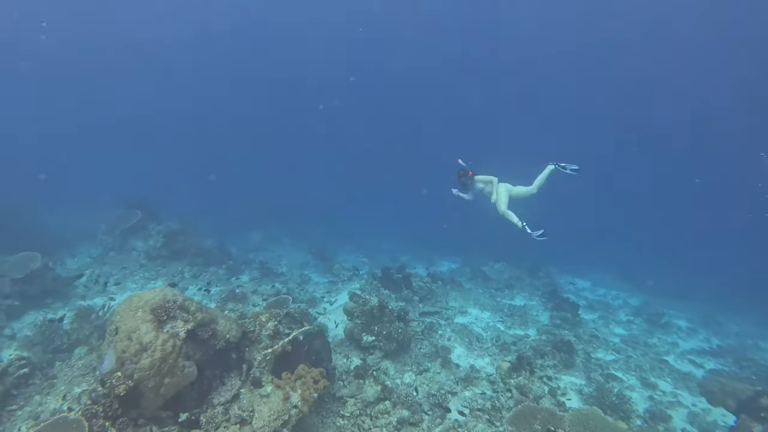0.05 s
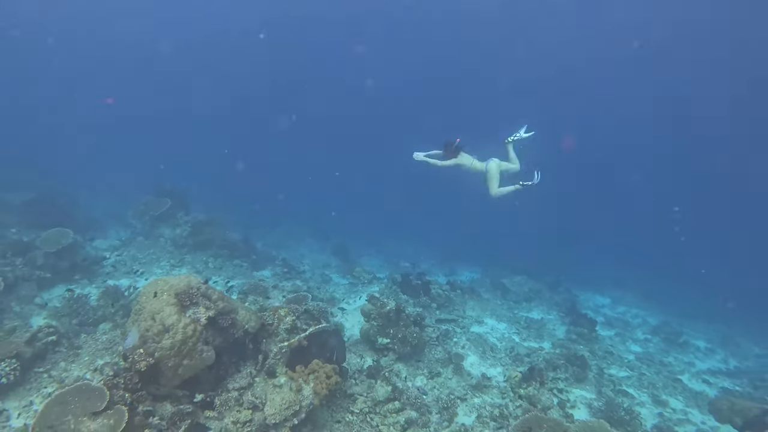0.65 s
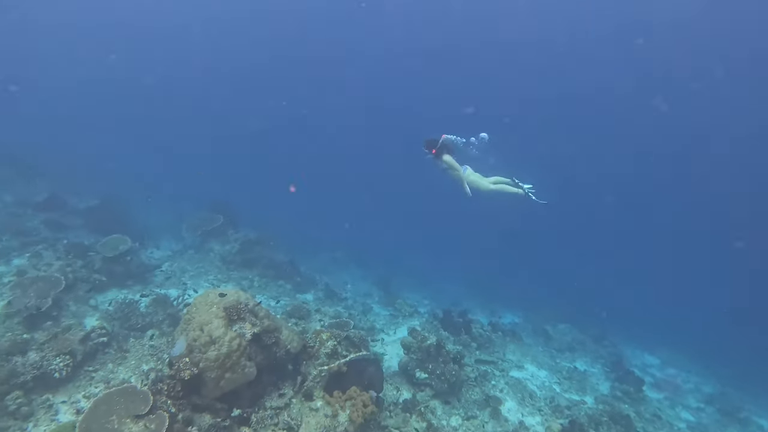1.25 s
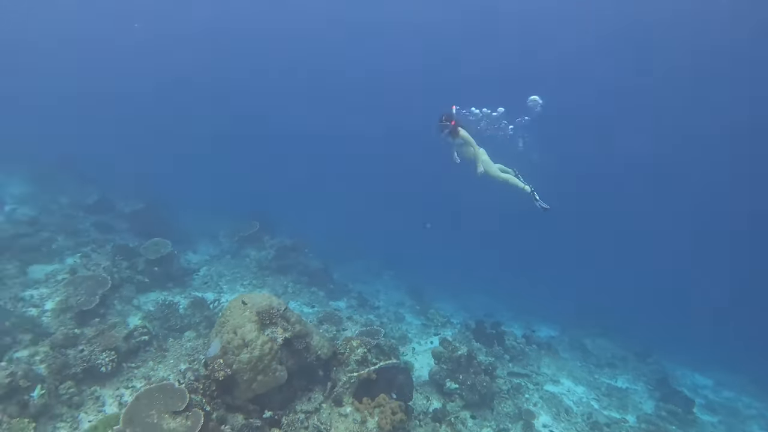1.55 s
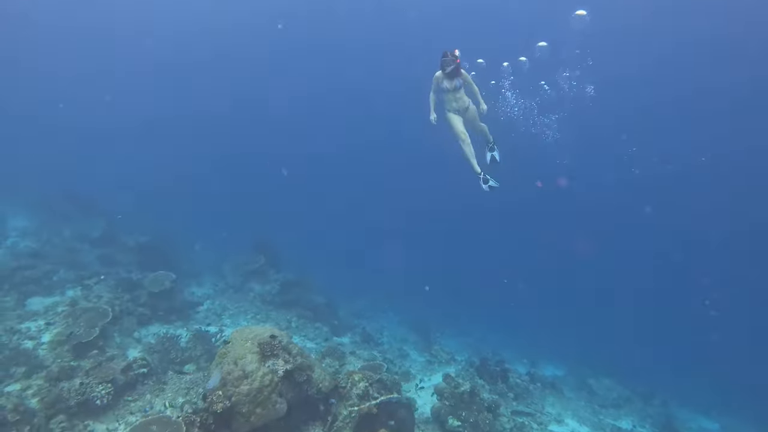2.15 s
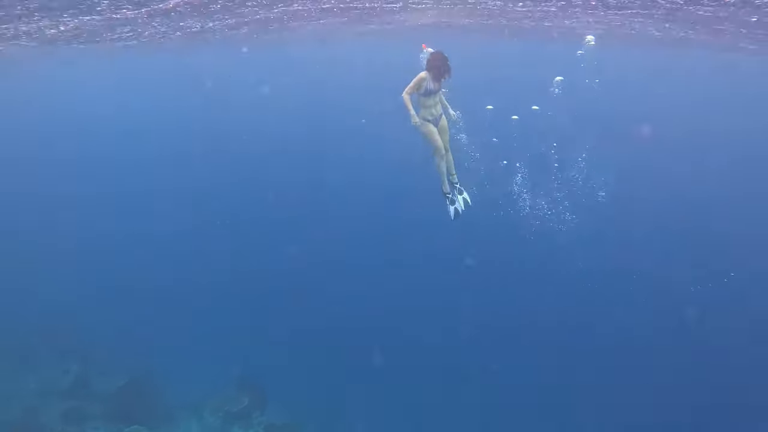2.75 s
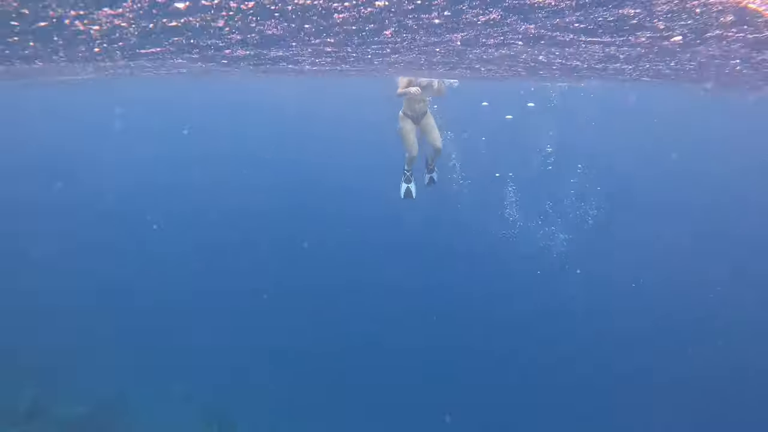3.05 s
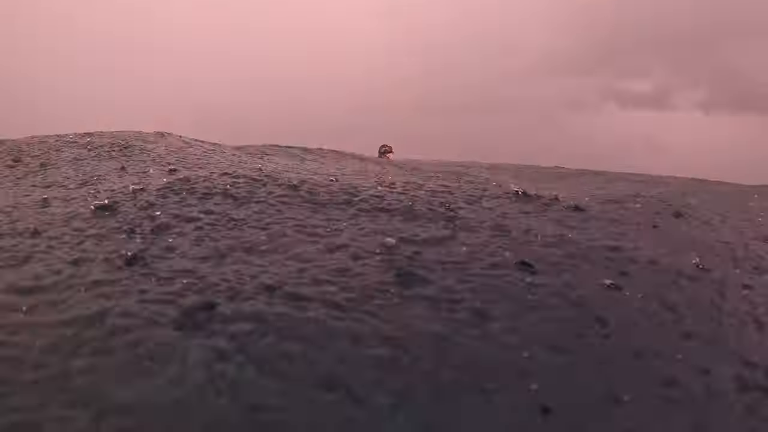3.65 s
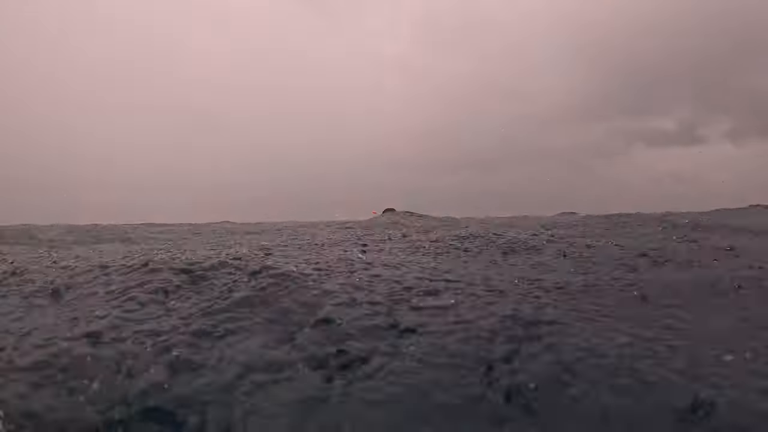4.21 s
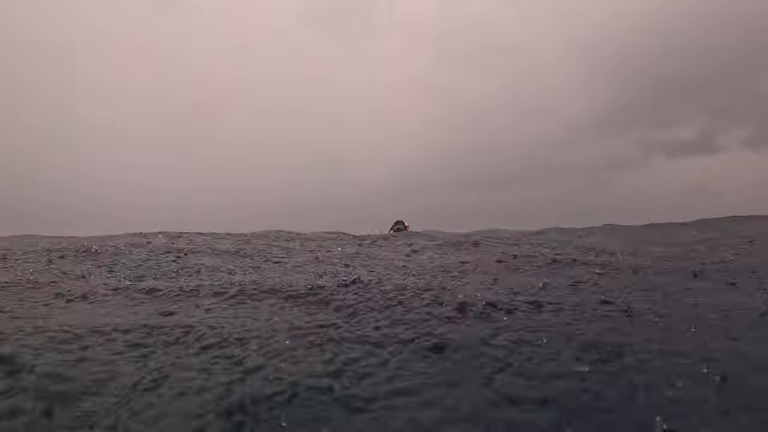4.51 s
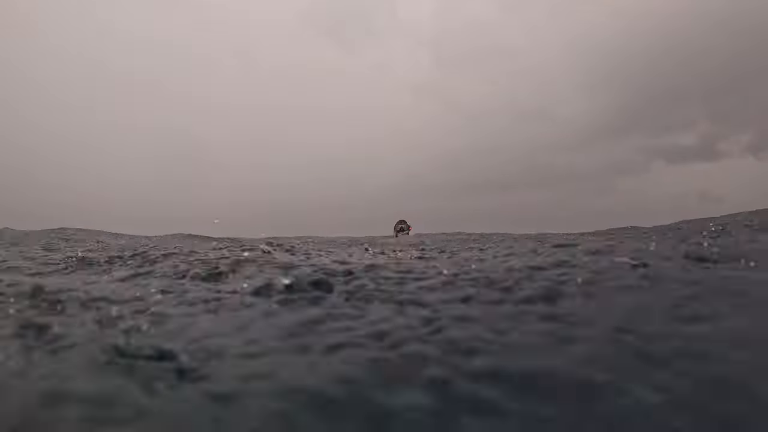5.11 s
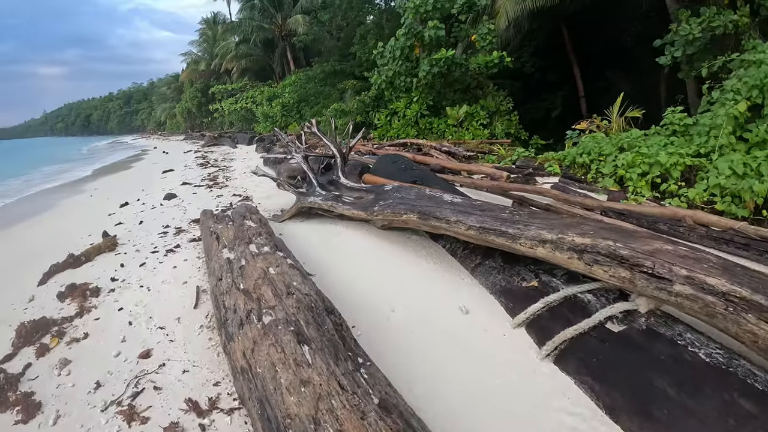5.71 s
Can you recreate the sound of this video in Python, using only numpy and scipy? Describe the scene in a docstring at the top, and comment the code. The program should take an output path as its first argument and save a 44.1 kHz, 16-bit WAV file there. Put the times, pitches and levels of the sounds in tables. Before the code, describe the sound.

A camera housing clacks and glugs underwater amid snapping shrimp, water slaps and bubbles around it, then faint wind and distant surf follow.

```python
"""Hollow knocks under water: a waterproof camera housing bumps in the hand as it rises from a coral reef.
Its shell clacks, trapped air glugs, runs of ticks purr like a small motor, and shrimp snap all around.
At the surface, water slaps, splats, fizzes and gulps round the microphone, and the spray grows duller.
The water stops dead; a breezy beach fades in, with wind buffeting the microphone over far surf."""
import sys
import numpy as np
from scipy import signal
from scipy.fft import rfft, irfft
from scipy.io import wavfile
from scipy.ndimage import uniform_filter1d

SR = 44100
rng = np.random.default_rng(int(sys.argv[2]) if len(sys.argv) > 2 else 0)


def dump(signal):
    """Clip the signal to [-1, 1] and save it as 16-bit WAV at the path in sys.argv[1]."""
    limited = np.clip(np.atleast_2d(signal).T, -1, 1)
    pcm = np.round(limited * 32767).astype(np.int16)
    wavfile.write(sys.argv[1], SR, pcm)


N = 263277
T = np.arange(N) / SR
SURFACE_S, CUT_S, BEACH_S = 3.17, 5.136, 5.3
BAND_LIMIT_HZ, OPEN_TREBLE_HZ = 16100, 16960
KNOCK_SCATTER = 0.1154  # relative spread of pitch and timing from blow to blow

# far surf and leaves: (frequency [Hz], level [dB])
SHORE_EQ = [(150, -13), (600, -19.5), (1090, -1.5), (1350, -18), (4100, -25), (8000, -52.5)]
# wind on the microphone: (frequency [Hz], level [dB])
WIND_EQ = [(21, 2.5), (30, -19), (115, -41.5), (165, -53.5)]
# gusts of that wind: (time [s], level [dB])
WIND_LEVEL = [(5.33, -18), (5.46, -27), (5.62, -25), (5.75, -33.5), (5.821, -19.5)]
# water pushing on the housing: (frequency [Hz], level [dB])
SLOSH_EQ = [(20, 5.5), (50, -4), (105, -5), (170, -20)]
# water gurgling along it: (frequency [Hz], level [dB])
GURGLE_EQ = [(170, -4), (280, 3), (700, -16)]
# slow contour of push and gurgle: (time [s], level [dB])
SLOSH_LEVEL = [(1.3, -31), (2.8, -32), (3.6, -31), (4.2, -27.5), (4.599, -37.5), (5.102, -28)]
# hollow sizzle of the reef, before its resonances climb: (frequency [Hz], level [dB])
REEF_EQ = [(2650, -17), (3080, -22), (3300, -13.5), (3600, -25.5), (3870, -13), (4150, -31), (4580, -17),
           (5700, -14), (7300, -23.5), (15000, -26)]
# swell of that sizzle: (time [s], level [dB])
REEF_LEVEL = [(.3, -53), (1.4, -49.5), (3.1, -57)]
# near shrimp snaps: (time [s], peak level [dB])
NEAR_SNAPS = [(.158, -25), (.387, -15.5), (0.4276, -17.5), (.54, -19), (0.5553, -11.5), (0.689, -18.5),
              (1.651, -15.5), (1.808, -19.5)]
# crack of one snap: (frequency [Hz], level [dB])
SNAP_EQ = [(4000, 5), (5400, 12.2), (16000, 1.3)]
# wavelets washing over the housing: (crest time [s], relative level [dB])
WAVELET_CRESTS = [(3.274, -28), (3.421, -34.5), (3.727, -33.5), (4.023, -28), (4.218, -31), (4.818, -40.5),
                  (5.11, -32)]
# fine hiss of the water film: (frequency [Hz], level [dB])
HISS_EQ = [(450, 10), (5200, 5.5), (16000, -0.5)]
# small free bubbles: (time [s], starting pitch [Hz], peak level [dB])
BUBBLE_PLINKS = [(.455, 1640, -16), (.481, 1976, -25), (3.157, 1760, -11.5), (3.318, 2730, -9.5),
                 (3.441, 1106, -22.5), (3.5118, 2800, -7.5), (3.767, 2830, -7), (3.914, 2430, -10),
                 (4.045, 2100, -8.5), (4.067, 4330, -8.5), (4.232, 3510, -8)]
# large air pockets against the housing: (time [s], starting pitch [Hz], peak level [dB])
AIR_GULPS = [(2.97, 113, -13), (3.914, 215, -17), (4.204, 146.7, -8.5), (4.212, 400, -16.5),
             (4.226, 100.5, -11), (4.405, 139.6, -9), (5.109, 324.5, -11), (5.12, 76.4, -8.5)]
# soft glugs of air between the knocks: (time [s], level [dB])
AIR_GLUGS = [(0.429, -22), (1.072, -35.5), (1.783, -18.5), (2.025, -21.5), (2.94, -18.5)]
# low ring of a tick: (base frequency [Hz], level [dB], t60 [s])
TICK_LOW_MODES = [(984, -6, 0.062), (710, -9.5, 0.0096), (1170, -10, 0.02)]
# high ring of a tick, retuned for each run: (base frequency [Hz], level [dB], t60 [s])
TICK_HIGH_MODES = [(1770, -2.5, 0.022), (2114, -1, 0.0027)]
# faint bed of ticking under water: (time [s], level [dB])
TICKING_LEVEL = [(.35, -37.5), (.8, -30.5), (.92, -33.5), (3.15, -36.5)]
# runs of quick ticks: (start [s], end [s], level [dB], high ring balance [dB], high ring pitch [Hz])
TICK_RUNS = [(0.194, 0.196, -10, 2.5, 1750), (0.2237, .29, -15.5, 2.5, 1647), (0.628, 0.723, -17, -5, 1680),
             (1.034, 1.069, -16.5, 5, 1770), (1.126, 1.171, -15.5, 2, 1720), (1.229, 1.266, -10, 7, 1750),
             (1.735, 1.809, -16, 2.5, 1880), (2.135, 2.192, -13.5, 7, 1930)]
# loudest splats at the surface: (time [s], level [dB], centre frequency [Hz])
SURFACE_SPLATS = [(3.12, -24.5, 1110), (3.136, -23, 1170), (3.156, -20.5, 4130), (3.209, -19, 5700),
                  (3.244, -26, 4230), (3.266, -20.5, 4760), (3.375, -27.5, 6600), (3.409, -23, 6160),
                  (3.599, -24.5, 10500), (3.712, -23.5, 7400), (3.895, -22.5, 4650), (3.913, -20.5, 1500),
                  (3.955, -19.5, 4500), (3.973, -22, 5000), (4.012, -26.5, 2430), (4.028, -17.5, 9900),
                  (4.151, -19.5, 1310), (4.172, -23.5, 3570), (4.387, -26, 3650), (4.547, -34.5, 4560),
                  (4.578, -26, 6030), (4.654, -28, 3490), (4.676, -30.5, 2600), (4.741, -27, 1910),
                  (4.813, -25, 2070), (4.841, -25, 1800), (4.977, -33, 2204), (5.119, -21.5, 693)]
# flat slaps of water: (time [s], peak level [dB])
WATER_SLAPS = [(3.157, -9), (4.058, -13), (4.082, -7.5), (4.0915, -11), (4.128, -6)]
# body of one slap: (frequency [Hz], level [dB])
SLAP_EQ = [(150, 5), (550, -0.5), (1320, -1.5), (2200, -12)]
# modes of the housing's shell: (frequency [Hz], level [dB], t60 [s])
SHELL_MODES = [(730, 5, 0.026), (1000, 6, 0.024), (1373, 10.5, 0.013), (1800, 15.5, 0.0073)]
# knocks on the housing: (time [s], clack level [dB], favoured pitch [Hz], thud level [dB])
HOUSING_KNOCKS = [(.001, -17, 953, -15.5), (0.12, -8.5, 724, -14), (.395, -13, 662, -27),
                  (.843, -11.5, 980, -27), (0.8509, -2, 1120, -11), (0.862, -5.5, 990, -26.5),
                  (0.9423, -5.5, 1160, -12.5), (1.381, -3, 1448, -12), (1.478, -23, 770, -21),
                  (1.805, -11, 1040, -13), (1.904, -4, 1510, -10), (2.298, 0, 1420, -10),
                  (2.394, -17.5, 740, -26), (2.427, -13.5, 750, -13.5), (2.504, -14.5, 1100, -18.5),
                  (2.579, -6.5, 1000, -14.5), (2.606, -13.5, 850, -26), (2.802, -6.5, 1170, -13.5),
                  (2.955, -9.5, 730, -12)]


def amp(db):
    """Turns decibels into gain."""
    return 10 ** (np.asarray(db) / 20)


def unit(x):
    """Scales to rms 1."""
    return x / np.sqrt(np.mean(x ** 2) + 1e-20)


def unit_peak(x):
    """Scales to an envelope peak of 1."""
    return x / abs(signal.hilbert(x)).max()


def fader(rows):
    """Gain that rides through (time, level) rows."""
    return amp(np.interp(T, *np.transpose(rows)))


def eq_gain(points, hz):
    """Gain of an EQ curve, falling 23 dB an octave beyond its ends."""
    point_hz, db = np.transpose(points)
    octave, knots = np.log2(hz + 1), np.log2(point_hz)
    outside = np.maximum(knots[0] - octave, 0) + np.maximum(octave - knots[-1], 0)
    return amp(np.interp(octave, knots, db) - 23 * outside)


def filtered(x, order, hz, kind):
    """Butterworth filter."""
    return signal.sosfilt(signal.butter(order, hz, kind, fs=SR, output="sos"), x)


def eq_noise(points):
    """Noise coloured by an EQ curve; rms 1."""
    return unit(irfft(rfft(rng.standard_normal(N)) * eq_gain(points, np.fft.rfftfreq(N, 1 / SR)), N))


def band_noise(low_hz, high_hz, size):
    """Noise in one band; rms 1."""
    return unit(filtered(rng.standard_normal(size), 2, [low_hz, high_hz], "band"))


def sharpest_click(gain):
    """The minimum-phase click with this gain spectrum."""
    log_gain = np.log(np.maximum(np.r_[gain, gain[-2:0:-1]], 1e-5))
    return np.fft.ifft(np.exp(np.conj(signal.hilbert(log_gain)))).real


def wander(depth_db, size):
    """A random factor around 1 that drifts over about size samples."""
    drift = uniform_filter1d(uniform_filter1d(rng.standard_normal(N), size), size)
    return amp(depth_db * np.clip(unit(drift), -2, 1))


def add(mix, s, sound):
    """Mixes a sound in at time s."""
    part = mix[..., max(round(s * SR), 0):][..., :sound.shape[-1]]
    part += sound[..., :part.shape[-1]]


def ring(modes, t, detune):
    """Dying modes of alternating sign, tuned a little differently at each blow."""
    out = np.zeros(len(t))
    for k, (hz, db, t60) in enumerate(modes):
        pitch = hz * (1 + detune * rng.standard_normal())
        out += (-1) ** k * amp(db - 60 * t / t60) * np.sin(2 * np.pi * pitch * t)
    return out


def muffled(x, edge_hz, leak_db):
    """The housing passes little above its own modes."""
    return filtered(x, 8, edge_hz, "low") + amp(leak_db) * x


def rumble(eq, level):
    """Low turbulence, evened out so that it follows a level curve."""
    noise = eq_noise(eq)
    return noise / np.sqrt(uniform_filter1d(noise ** 2, size=6000)) * fader(level)


def beach(shore_db=-52, fade_s=0.1):
    """Wind buffets the microphone over a far wash of surf and leaves."""
    fade_in = np.clip((T - BEACH_S) / fade_s, 0, 1) ** 2
    return fade_in * (amp(shore_db) * eq_noise(SHORE_EQ) + rumble(WIND_EQ, WIND_LEVEL))


def slosh(gurgle_db=-15):
    """Water pushes on the housing and gurgles softly along it."""
    push = rumble(SLOSH_EQ, SLOSH_LEVEL) * wander(depth_db=4.2, size=900)
    gurgle = amp(gurgle_db) * rumble(GURGLE_EQ, SLOSH_LEVEL) * wander(depth_db=3, size=500)
    return push + gurgle


def patter(per_s, spread_db):
    """Random impulses, a few much larger than the rest."""
    size = amp(spread_db * np.minimum(rng.exponential(1, N), 4.5))
    return size * rng.choice([-1, 1], N) * (rng.random(N) < per_s / SR)


def reef_sizzle(width_db=-3, climb_per_s=0.049):
    """Far shrimp blur into a hollow sizzle whose resonances climb as the camera rises."""
    centre, left, right = [patter(per_s=1000, spread_db=5) for _ in range(3)]
    crackle = centre + amp(width_db) * np.array([left, right]) + 0.4 * rng.standard_normal((2, N))
    hz, t, spectrum = signal.stft(crackle, SR, nperseg=512)
    resonances = eq_gain(REEF_EQ, hz[:, None] / (1 + climb_per_s * t))
    sizzle = signal.istft(spectrum * resonances, SR, nperseg=512)[1][:, :N]
    return fader(REEF_LEVEL) * unit(sizzle) * (T < SURFACE_S)


def shrimp_snaps(lesser_db=-39, tail_db=-19.5, tail_t60=0.015):
    """Near shrimp crack among many lesser ones; each snap has its own low cut and a short stereo tail."""
    out, t, hz = np.zeros((2, N)), T[:512], np.fft.rfftfreq(512, 1 / SR)
    lesser = [(s, lesser_db + 4.3 * min(rng.exponential(), 3)) for s in rng.uniform(0, SURFACE_S, 110)]
    for s, db in NEAR_SNAPS + lesser:
        low_cut_hz = rng.uniform(3600, 5000)
        click = sharpest_click(eq_gain(SNAP_EQ, hz) / (1 + (low_cut_hz / (hz + 1)) ** 4))
        scatter = rng.standard_normal(len(t)) + .5 * rng.standard_normal((2, len(t)))
        tail = scatter * amp(tail_db - 60 * t / tail_t60)
        crack = signal.fftconvolve((t == 0) + tail, click[None])
        add(out, s, amp(db) * crack / abs(crack).max())
    return out


def wetness(s, wash_db_per_s=131, drain_db_per_s=114, floor_db=-44):
    """Gain of fizz and froth: each wavelet washes up, then drains to the level of the wet housing."""
    washes = [amp(db - np.maximum(wash_db_per_s * (crest_s - s), drain_db_per_s * (s - crest_s)))
              for crest_s, db in WAVELET_CRESTS]
    return np.sqrt(amp(floor_db) ** 2 + np.sum(np.square(washes), axis=0))


def treble_edge(s, from_s=3.373, octaves_per_s=1.194, lowest_hz=5060):
    """The top of the treble, in Hz, sinks steadily once the camera floats."""
    return np.maximum(OPEN_TREBLE_HZ * 2 ** (-octaves_per_s * np.maximum(s - from_s, 0)), lowest_hz)


def dulled(x, shelf_db=-17, ridge_db=7, ridge_octaves=.14):
    """A high shelf sweeps down; a bright ridge and a dark trough slide along below it."""
    hz, t, spectrum = signal.stft(x, SR, nperseg=192)
    hz, edge_hz = hz[:, None] + 1, treble_edge(t)
    shelf = 1 / (1 + (hz / edge_hz) ** -16)
    offset = np.log2(hz / np.minimum(.28 * edge_hz, 3450)) / ridge_octaves
    ridge = -offset * np.exp(.5 - .5 * offset ** 2)
    return signal.istft(spectrum * amp(shelf_db * shelf + ridge_db * ridge), SR, nperseg=192)[1][:, :N]


def fizz(spatter_db=-4, hiss_db=-10, span_octaves=2.88):
    """Small splats burst in the film of water, over a fine hiss."""
    spatter = np.zeros((2, N))
    for s in rng.uniform(SURFACE_S, CUT_S, size=150):
        db = spatter_db + 5.5 * min(rng.exponential(), 2)
        centre_hz = 0.77 * treble_edge(s) * 2 ** (-span_octaves * rng.random())
        add(spatter, s, wetness(s) * amp(db) * splat(s, centre_hz, skirt_db=2))
    return spatter + eq_noise(HISS_EQ) * wetness(T) * amp(hiss_db) * (T > SURFACE_S)


def bubble(hz, db, t60, rise=0, wobble=0):
    """A pocket of air swells into a splashy ring and dies; its pitch rise and wobble are in octaves."""
    t = T[:6000]
    shudder = wobble * unit(uniform_filter1d(rng.standard_normal(len(t)), size=90))
    pitch = hz * 2 ** (rise * np.minimum(t / t60, 1) + shudder)
    tone = np.sin(2 * np.pi * np.cumsum(pitch) / SR)
    splash = .3 * band_noise(hz / 1.2, hz * 1.2, size=len(t))
    attack = (1 - np.exp(-t / .0015)) ** 2
    return amp(db) * unit_peak((tone + splash) * amp(-60 * t / t60) * attack)


def froth(froth_db=-2, lowest_hz=450, cycles=28):
    """Small bubbles burble, loudest in the wavelets, each rising in pitch."""
    out = np.zeros(N)
    for s in rng.uniform(SURFACE_S, CUT_S, size=90):
        hz = lowest_hz * 2 ** (2 * rng.random())
        db = froth_db + 2 * rng.standard_normal()
        add(out, s, wetness(s) * bubble(hz, db, t60=cycles / hz, rise=0.19, wobble=0.025))
    return out


def plinks_and_gulps(gulp_cycles=13.6):
    """Small bubbles plink and large ones gulp; the higher the pitch, the shorter the ring."""
    out = np.zeros(N)
    for s, hz, db in BUBBLE_PLINKS:
        add(out, s, bubble(hz, db, t60=0.085 * (hz / 1000) ** -1.71, rise=0.12, wobble=0.049))
    for s, hz, db in AIR_GULPS:
        add(out, s, bubble(hz, db, t60=gulp_cycles / hz, rise=0.39, wobble=0.27))
    return out


def glug(db, ring_hz=278.6, push_hz=185):
    """Trapped air rings hollow over a short low push, at a slightly different pitch each time."""
    hz = ring_hz * np.exp(KNOCK_SCATTER * rng.standard_normal() / 2)
    return bubble(hz, db, t60=0.087, wobble=0.053) + bubble(push_hz, db - 5, t60=0.037)


def trapped_air(churn_db=-18.5, churn_db_per_s=293.5):
    """Air against the housing glugs softly; churning builds before each knock or glug and ebbs after."""
    out = np.zeros(N)
    for s, db in AIR_GLUGS:
        add(out, s, glug(db))
    churn = sum(amp(db + churn_db - churn_db_per_s * abs(T - s))
                for s, *_, db in HOUSING_KNOCKS + AIR_GLUGS)
    return out + churn * band_noise(237, 315, size=N)


def tick(s, high_db, high_hz, bend, climb_per_s=0.029):
    """A dry tick of two rings, both bent in pitch by a factor; the low one climbs as the camera rises."""
    t = T[:1024] * bend
    low = ring(TICK_LOW_MODES, t * (1 + climb_per_s * s), detune=.012)
    high = ring(TICK_HIGH_MODES, t * high_hz / TICK_HIGH_MODES[0][0], detune=.015)
    return unit_peak(low - amp(high_db) * high)


def faint_ticking():
    """An uneven bed of ticks wavers in pitch and level all the way up to the surface."""
    bed = np.zeros(N)
    waver = wander(depth_db=.3, size=1500)
    for s in rng.uniform(0, SURFACE_S, size=1300):
        db = 1.2 * min(rng.exponential(), 3.5)
        high_db = 1 + 1.9 * rng.standard_normal()
        add(bed, s, amp(db) * tick(s, high_db, high_hz=1770, bend=np.interp(s, T, waver)))
    bed *= wander(depth_db=1.3, size=2000)
    return bed * fader(TICKING_LEVEL) / bed[T < SURFACE_S].std()


def purr(ticks_per_s=115, slowing_oct_per_s=2.7, brightening_db_per_s=134, glide_oct_per_s=0.44):
    """Stumbling runs of ticks swell and fall; each starts fast, then slows, brightens and glides up."""
    out = np.zeros(N)
    for start, end, db, high_db, high_hz in TICK_RUNS:
        s = start
        while s < end:
            swell_db = 4 * (np.sin(np.pi * (s - start) / (end - start)) - .5)
            past_middle_s = s - (start + end) / 2
            bend = 2 ** (glide_oct_per_s * past_middle_s)
            sound = tick(s, high_db + brightening_db_per_s * past_middle_s, high_hz, bend)
            jitter_s, jitter_db = .0002 * rng.standard_normal(), 1.3 * rng.standard_normal()
            add(out, s + jitter_s, amp(db + swell_db + jitter_db) * sound)
            s += 2 ** (slowing_oct_per_s * (s - start)) / ticks_per_s
    return out


def splat(s, centre_hz, skirt_db, depth_db=21, fall_s=0.0117, tail_t60=0.1, push_hz=650):
    """Water bursts around one pitch with a dull push on the housing, falls back once and dribbles away."""
    t = T[:2400]
    octaves = np.log2((np.fft.rfftfreq(512, 1 / SR) + 1) / centre_hz)
    band = amp(-depth_db * np.tanh(skirt_db * octaves ** 2 / depth_db) - 2 * abs(octaves))
    attack_s = 0.00095 * (OPEN_TREBLE_HZ / treble_edge(s)) ** 0.7  # softer as the treble closes
    fall_lag_s = fall_s * (.5 + rng.random())
    hit, fall = [age * np.exp(1 - age) for age in np.maximum([t, t - fall_lag_s], 0) / attack_s]
    envelope = hit + amp(-15) * fall + amp(-20 - 60 * t / tail_t60)
    grit = rng.standard_normal(len(t)) + 0.067 * rng.standard_normal((2, len(t)))
    burst = signal.fftconvolve(grit * envelope, sharpest_click(band)[None])
    burst /= burst[:, :220].std()  # the first 5 ms set the level
    add(burst, 0, amp(-12) * envelope * band_noise(push_hz / 2, push_hz * 2, size=len(t)))
    return burst


def splats():
    """Water splashes against the bobbing housing."""
    out = np.zeros((2, N))
    for s, db, centre_hz in SURFACE_SPLATS:
        add(out, s, amp(db) * splat(s, centre_hz, skirt_db=12))
    return out


def slaps(churn_db=-25, churn_t60=0.075):
    """Water smacks flat on the housing: a sharp, full-bodied crack and a short churn."""
    out, t = np.zeros(N), T[:2000]
    body = sharpest_click(eq_gain(SLAP_EQ, np.fft.rfftfreq(1024, 1 / SR)))
    for s, db in WATER_SLAPS:
        churn = amp(churn_db - 60 * t / churn_t60) * rng.standard_normal(len(t))
        add(out, s, amp(db) * unit_peak(signal.fftconvolve((t == 0) + churn, body)))
    return out


def clack(db, focus_hz, focus_db_per_oct=9.5, scrape_db=-17):
    """The shell rings and scrapes briefly; its modes weaken away from the pitch the knock favours."""
    t = T[:6000]
    grit = muffled(band_noise(410, 1460, size=len(t)), edge_hz=1600, leak_db=-6.5)
    scrape = grit * np.exp(-t / 0.011)
    modes = [(hz, level - focus_db_per_oct * abs(np.log2(hz / focus_hz)), t60)
             for hz, level, t60 in SHELL_MODES]
    attack = (1 - np.exp(-t / .0016)) ** 2
    shell = unit_peak(ring(modes, t, detune=.025) * attack)
    return amp(db) * (shell + amp(scrape_db) * scrape)


def knocks(pocket_hz=112, pocket_s=.03, rebound_s=.011):
    """Each knock clacks, glugs and rebounds once; a deeper pocket of air rings after it."""
    out = np.zeros(N)
    for s, db, focus_hz, thud_db in HOUSING_KNOCKS:
        scatter = np.exp(KNOCK_SCATTER * rng.standard_normal(3))
        hz, pocket_lag_s, rebound_lag_s = scatter * [pocket_hz, pocket_s, rebound_s]
        add(out, s, clack(db, focus_hz) + glug(thud_db))
        add(out, s + rebound_lag_s, clack(db - 8, focus_hz) + glug(thud_db - 9.5))
        add(out, s + pocket_lag_s, bubble(hz, thud_db - 8, t60=0.076, wobble=.1))
    return out


def scene():
    """The reef gives way to the surface; the water cuts out hard and the beach fades in."""
    housing = knocks() + trapped_air()
    ticks = muffled(faint_ticking() + purr(), edge_hz=2180, leak_db=-62.5)
    reef = shrimp_snaps() + reef_sizzle()
    surface = dulled(splats() + fizz() + froth()) + slaps()
    water = housing + ticks + reef + surface + plinks_and_gulps() + slosh()
    hard_cut = np.clip((CUT_S - T) / .001, 0, 1)
    return water * hard_cut + beach()


def record(dry, echo_db=-13, mono_below_hz=900, ceiling=.85):
    """Two microphone ports share the bass; a reflection in the housing spreads the treble."""
    mid = dry.mean(0)
    echo = filtered(np.roll(mid, 17), 1, 3000, "high")  # 0.4 ms late
    side = filtered(dry[0] - mid + amp(echo_db) * echo, 2, mono_below_hz, "high")
    ports = mid + np.array([side, -side])
    rounded = ports / (1 + (ports / ceiling) ** 6) ** (1 / 6)  # the loudest peaks saturate softly
    band_limit = signal.firwin(255, BAND_LIMIT_HZ, window=("kaiser", 8), fs=SR)
    return signal.oaconvolve(rounded, band_limit[None], "same")


dry = scene()
out = record(dry)
dump(out)
```